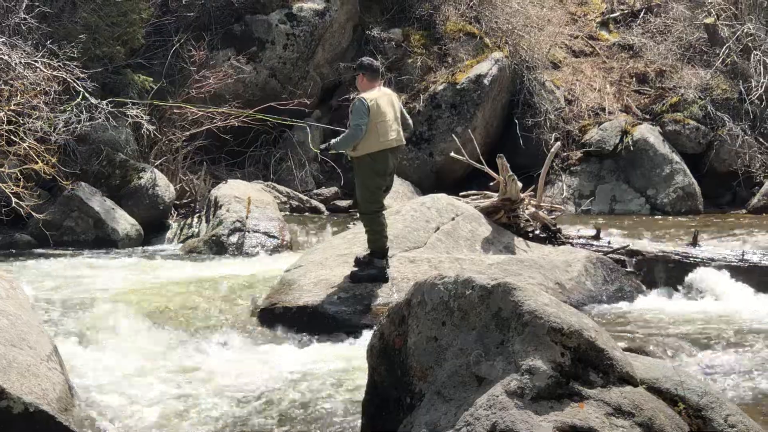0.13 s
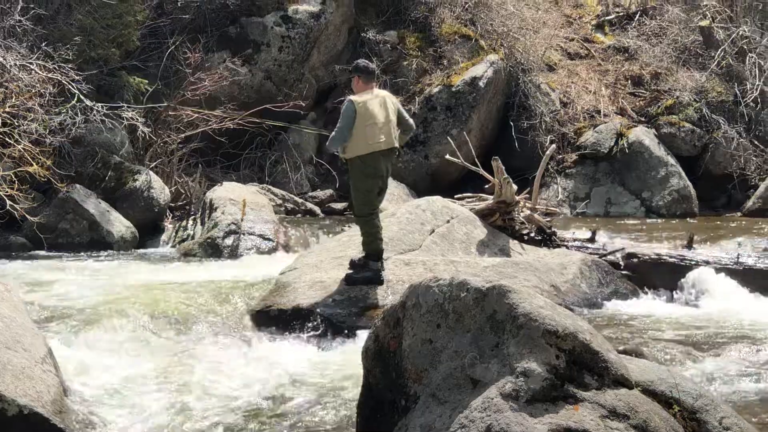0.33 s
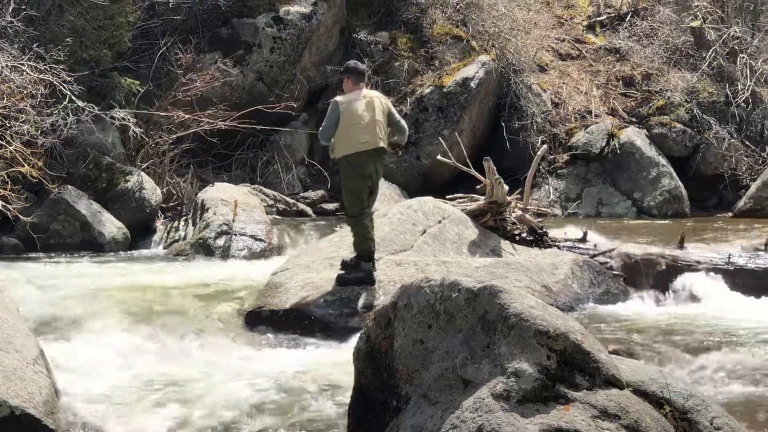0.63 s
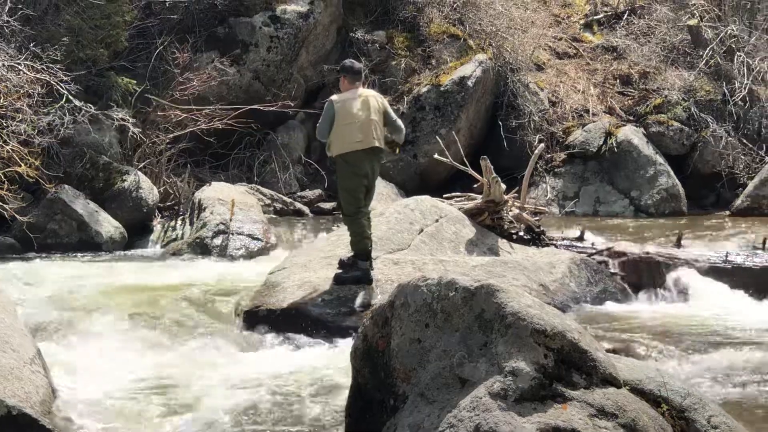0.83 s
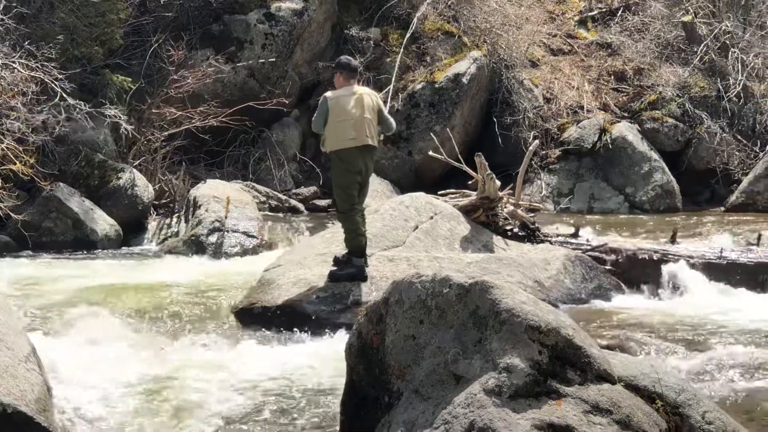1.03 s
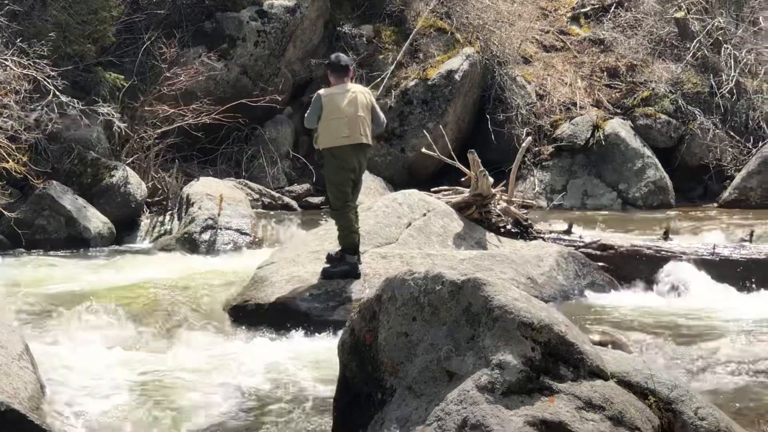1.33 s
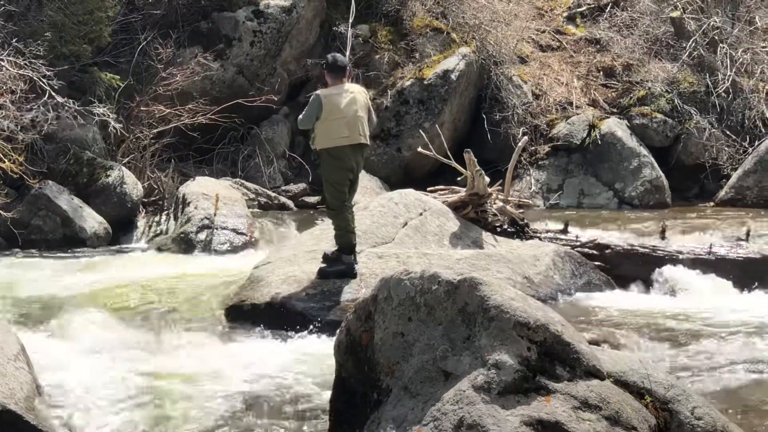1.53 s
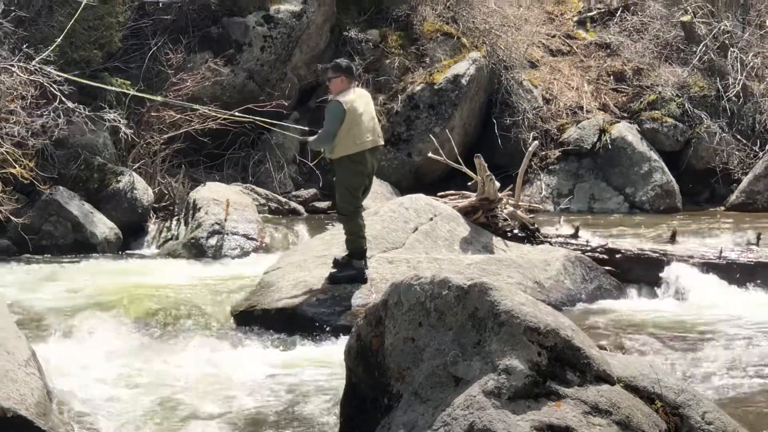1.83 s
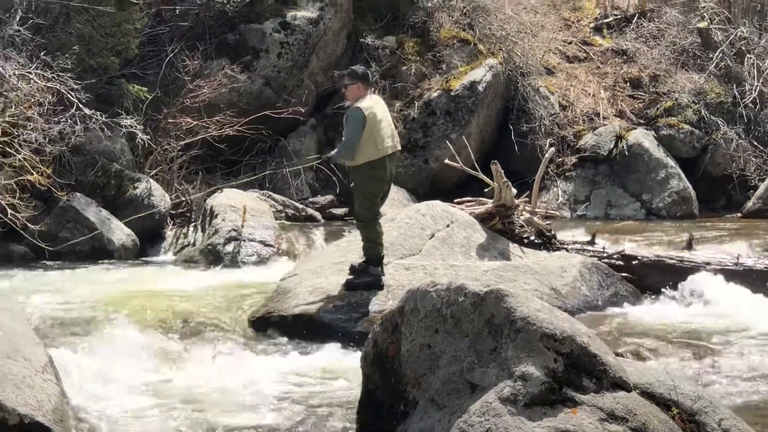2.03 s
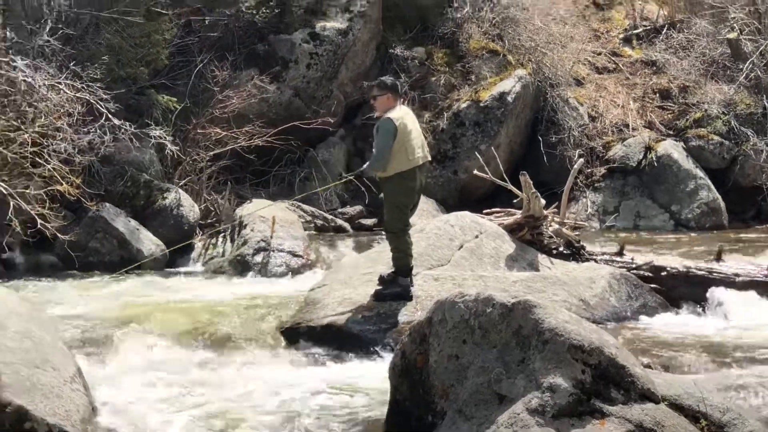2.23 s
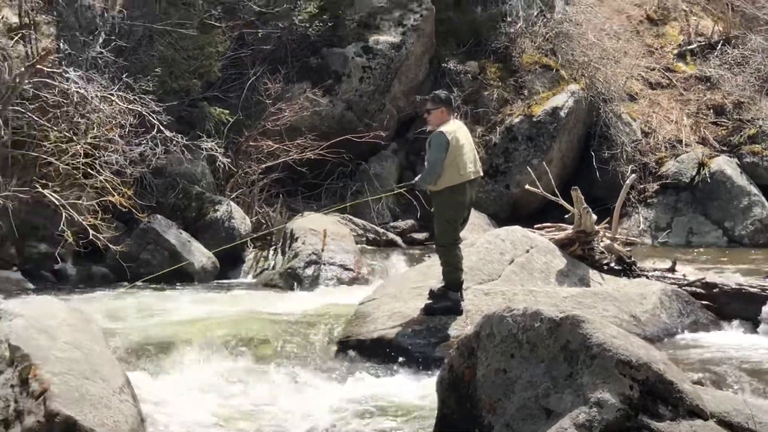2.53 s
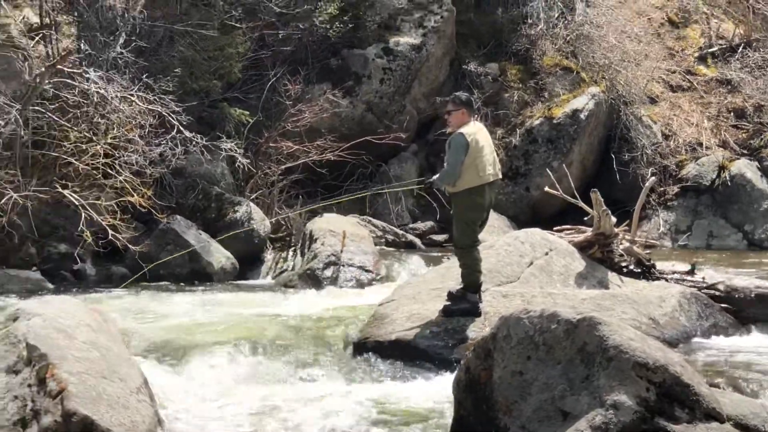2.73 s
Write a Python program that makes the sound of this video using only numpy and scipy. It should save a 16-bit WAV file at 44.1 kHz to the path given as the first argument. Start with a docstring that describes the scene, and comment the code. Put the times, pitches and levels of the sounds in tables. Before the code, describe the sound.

Turbulent mountain river roars continuously while gusts of wind knock and rumble against the microphone

```python
"""On the bank of a mountain river, white water rushes over boulders; both channels are the same.
The wash is noise with a shaped spectrum. Bubbles are short rings that rise in pitch, and spray
is a patter of bright ticks. A breeze rumbles on the microphone as low noise, and its eddies
bump it with short snaps, puffs and thuds, hardest in one gust at about 0.8 s."""
import sys
import numpy as np
from scipy import signal
from scipy.fft import rfft, irfft
from scipy.io import wavfile
from scipy.ndimage import uniform_filter1d

SR = 44100
rng = np.random.default_rng(int(sys.argv[2]) if len(sys.argv) > 2 else 0)


def log_audio(samples):
    """Write samples as a 16-bit WAV file to the path given in sys.argv[1]."""
    # one column per channel
    frames = np.atleast_2d(samples).T
    # limit to full scale, then quantise
    limited = np.clip(frames, -1, 1)
    pcm = np.round(limited * 32767).astype(np.int16)
    wavfile.write(sys.argv[1], SR, pcm)


N = 127890  # length in samples

# Tone colour of the eddies, large and small: (frequency [Hz], relative level per Hz [dB])
EDDY_COLOUR = [(20, -48), (70, -37), (150, 1), (300, -1.5), (550, -2.5), (800, -9), (1200, -23),
               (2200, -39), (5000, -60)]


def amp(db):
    """Turns decibels into a gain."""
    return 10 ** (np.asarray(db) / 20)


def evened(x):
    """Scales a sound to an average strength (rms) of 1."""
    return x / np.sqrt(np.mean(x ** 2) + 1e-20)


def read(points, hz):
    """Reads a spectrum between its points, with frequency spaced as the ear hears it."""
    f, value = np.transpose(points)
    return np.interp(np.log(hz + 1), np.log(f + 1), value)


def add(mix, s, sound):
    """Mixes a sound in at time s."""
    part = mix[max(round(s * SR), 0):][:len(sound)]
    part += sound[:len(part)]


def colour(x, points, size=4096):
    """Filters a sound to the given spectrum, with no echo ahead of the sound."""
    hz = abs(np.fft.fftfreq(size, 1 / SR))
    log_gain = np.log(amp(read(points, hz)))
    # the Hilbert transform finds the phase that puts the response as early as possible
    response = np.exp(np.conj(signal.hilbert(log_gain)))
    taps = np.fft.ifft(response).real
    return signal.fftconvolve(x, taps[:size // 2])


def wander(rate_hz):
    """Random drift of rms 1, mostly slower than the given rate."""
    hz = np.fft.rfftfreq(N, 1 / SR)
    spectrum = rfft(rng.standard_normal(N))
    slow = spectrum * (hz > 0) / (1 + (hz / rate_hz) ** 2)
    return evened(irfft(slow, N))


def swell(age, order):
    """Smooth rise to 1 at age = order, then an exponential fall."""
    return (age / order) ** order * np.exp(order - age)


def clicks(per_s, spread_db):
    """Random clicks of either sign, with sizes spread in decibels."""
    chance = rng.random(N)
    sign = rng.choice([-1, 1], N)
    size = np.minimum(rng.exponential(1, N), 4)
    return (chance < per_s / SR) * sign * amp(spread_db * size)


def patches(shape, size=(7, 7)):
    """Random blotches over frequency and time, made by smoothing noise both ways."""
    blotches = uniform_filter1d(rng.standard_normal(shape), size[0], axis=0)
    return evened(uniform_filter1d(blotches, size[1], axis=1))


def wind():
    """Moving air makes a lumpy rumble and a flutter of small eddies; both follow the breeze."""
    # Strength of the breeze: (time [s], level [dB])
    breeze = [(.08,-37.5),(.13,-29.5),(.26,-37.5),(.38,-39),(.48,-34),(.63,-30),(.77,-32),(.83,-20.5),(.91,-27.5),(1.02,-26),(1.16,-24),(1.41,-29),(1.8,-28),(1.93,-33.5),(2.1,-27.5),(2.19,-31.5),(2.25,-29.5),(2.4,-31),(2.53,-38.5),(2.68,-31),(2.9,-32.5)]
    # Tone colour of the rumble: (frequency [Hz], relative level per Hz [dB])
    rumble_colour = [(20, -60), (32, -20), (48, -1.5), (75, -2), (115, -4), (200, -4), (350, -13.5),
                     (600, -23), (1200, -37), (4000, -71)]
    rumble_db, lumps_db = 1.5, 3.5  # rumble against the breeze level; depth of its lumps
    flutter_db, flutter_per_s = -6, 70  # flutter against the breeze level; clicks per second

    strength = amp(np.interp(np.arange(N) / SR, *np.transpose(breeze)))
    lumpy_noise = rng.standard_normal(N) * amp(lumps_db * wander(rate_hz=37))
    rumble = colour(lumpy_noise, rumble_colour)[:N]
    flutter = colour(clicks(flutter_per_s, spread_db=-3), EDDY_COLOUR)[:N]
    return strength * (amp(rumble_db) * evened(rumble) + amp(flutter_db) * evened(flutter))


def buffet(start, peak_db, hz, length):
    """A large slow eddy presses the microphone back and forth: a short low tone that swells and fades."""
    t = np.arange(0, length, 1 / SR)
    press = np.sin(np.pi * t / length) ** 2
    sway = np.sin(2 * np.pi * (hz * t + rng.random()))
    return start, amp(peak_db) * press * sway


def bump(start, level_db, bass_db, hz):
    """One eddy hits the microphone: a snap that sags in pitch, a dull puff and a slightly later low thud."""
    puff_db, puff_rise_s, puff_fade_s = -4, 0.0022, 0.0065
    snap_db, snap_s, snap_sag_s = -2.5, 0.0013, 0.017
    snap_overshoot = 1.303  # the snap starts at this many times hz
    thud_db, thud_s, thud_hz = -2.5, 0.0048, 148.2  # middle pitch, varied by up to half an octave

    t = np.arange(SR // 10) / SR
    rise = np.minimum(t / puff_rise_s, 1) ** 2
    fade = np.exp(-np.maximum(t - puff_rise_s, 0) / puff_fade_s)
    puff = colour(rise * fade * rng.standard_normal(len(t)), EDDY_COLOUR)[:len(t)]
    puff = puff / abs(puff).max()

    snap_phase, thud_phase, pitch = rng.random(3)
    turns = snap_overshoot * hz * snap_sag_s * np.log1p(t / snap_sag_s)
    snap = swell(t / snap_s, order=3) * np.sin(2 * np.pi * (turns + snap_phase))
    thud_turns = thud_hz * 2 ** (pitch - .5) * t
    thud = swell(t / thud_s, order=2) * np.sin(2 * np.pi * (thud_turns + thud_phase))
    hit = amp(snap_db) * snap + amp(puff_db) * puff + amp(thud_db + bass_db) * thud
    return start, amp(level_db) * hit


def spray(level_db=-41, per_s=1800):
    """Droplets and bursting foam tick in the treble: random clicks through a bright filter."""
    # (frequency [Hz], relative level per Hz [dB])
    bright = [(400, -42.5), (2000, 0.5), (5000, -8.5), (9500, -11.5), (15000, -22.5)]
    ticks = colour(clicks(per_s, spread_db=3.1), bright)
    return amp(level_db) * evened(ticks[:N])


def bubbles(low_hz=340, high_hz=4200, slope_db=-2.6, count=36):
    """Trapped air rings for a few cycles, rising in pitch; slope_db is per octave."""
    level_db, per_s = -38, 330  # per_s counts bubbles of all pitches together
    fade_cycles, pitch_rise = 11.1, 0.0253

    out = np.zeros(N)
    for hz in np.geomspace(low_hz, high_hz, count):
        turns = hz * np.arange(SR // 10) / SR
        age = turns / fade_cycles
        tone = np.sin(2 * np.pi * turns * (1 + pitch_rise * age))
        ring = tone * np.exp(-age) * (1 - np.exp(-turns))  # soft start, then a fade
        train = clicks(per_s / count, spread_db=2.5)
        gain = amp(slope_db * np.log2(hz / low_hz))
        out += gain * evened(signal.oaconvolve(train, ring)[:N])
    return amp(level_db) * evened(out)


def wash():
    """Broad roar of the white water: noise that swells slightly, flickers and shifts in patches."""
    # Tone colour of the roar: (frequency [Hz], relative level per Hz [dB])
    roar_colour = [(25, -25), (70, 0.5), (200, -13.5), (500, -3.5), (750, -6), (1100, -6.5), (1550, -11.5),
                   (2200, -11.5), (3100, -18), (5000, -19.5), (9300, -24), (12000, -29), (15800, -31.5)]
    level_db = -30.5
    swell_db, patch_db, flicker_db = 0.39, 1.2, 0.58  # typical size of each change

    # split the noise into short slices of frequencies, shape them, and join them again
    hz, _, slices = signal.stft(rng.standard_normal(N), SR, nperseg=1024, noverlap=768)
    slices = slices * amp(read(roar_colour, hz)[:, None] + patch_db * patches(slices.shape))
    roar = signal.istft(slices, SR, nperseg=1024, noverlap=768)[1][:N]
    change_db = swell_db * wander(rate_hz=3.7) + flicker_db * wander(rate_hz=45)
    return amp(level_db) * evened(roar * amp(change_db))


def scene():
    """Surging river sounds plus wind, the same in both channels."""
    # Surge of the rapids: (time [s], level [dB])
    surge_points = [(.1,1),(.45,0.9),(.85,0.26),(1.05,1.4),(1.25,0),(1.6,0.55),(1.82,1),(1.9,-1),(2.0,1.2),(2.15,-0.3),(2.65,0.7),(2.9,0)]
    # Eddies that bump the microphone:
    # (time [s], level [dB], extra thud level [dB], snap pitch before overshoot and sag [Hz])
    eddies = [(0.437,-16.5,-16,257),(.544,-10.5,-15,377),(.623,-11,-18,480),(.651,-13.5,-14,580),(.818,0.5,-15.5,450),(.866,-17,-16,239),(0.883,-8.5,-27,525),(.893,-8,-25,490),(0.919,-7.5,-13,380),(0.948,-8.5,-9,550),(.956,-10,-10,267),(.977,-5,-32,288),(.985,-11,0,386),(1.149,-13,-2.5,300),(1.187,-8,-22,390),(1.212,-14,-13,298),(1.462,-14.5,-9,325),(1.552,-16,-1,230),(1.565,-19,-4,393),(1.707,-13,-6.5,315),(1.782,-19.5,-8,257),(1.814,-19,-19,288),(2.053,-14.5,-2,303),(2.107,-15,-6,400),(2.237,-14,-6,446),(2.261,-19,-7,474),(2.304,-19.5,3.5,235),(2.34,-21.5,-6,353),(2.722,-15,-2,404),(2.821,-20,-1,288),(2.85,-19,-4,244)]
    # Slow buffets of air: (time [s], peak level [dB], pitch [Hz], length [s])
    slow_eddies = [(0.29,-22,115,0.02),(0.545,-23,85.5,0.031),(0.957,-22.5,93.5,0.063),(1.235,-15,79,0.077),(1.3,-21,85,0.075),(1.343,-22,89.6,0.054),(1.45,-21,73.5,0.044),(1.8,-22.5,77,0.064),(2.04,-27,101,0.062),(2.218,-20,65,0.054),(2.282,-21,74,0.045)]

    surge = amp(np.interp(np.arange(N) / SR, *np.transpose(surge_points)))
    river = surge * (wash() + bubbles() + spray())
    mix = river + wind()
    for row in eddies:
        add(mix, *bump(*row))
    for row in slow_eddies:
        add(mix, *buffet(*row))
    return np.array([mix, mix])


def record(dry):
    """Rounds off high peaks, keeps a moment of silence at the start and removes the highest treble."""
    start_s, ceiling, edge_hz = .072, .9, 15900  # ceiling: full scale is 1
    running = np.arange(N) / SR >= start_s
    limited = dry / (1 + (dry / ceiling) ** 6) ** (1 / 6)
    taps = signal.firwin(511, edge_hz, window=("kaiser", 9), fs=SR)
    return signal.oaconvolve(limited * running, taps[None], "same", axes=1)


dry = scene()
out = record(dry)
log_audio(out)
```